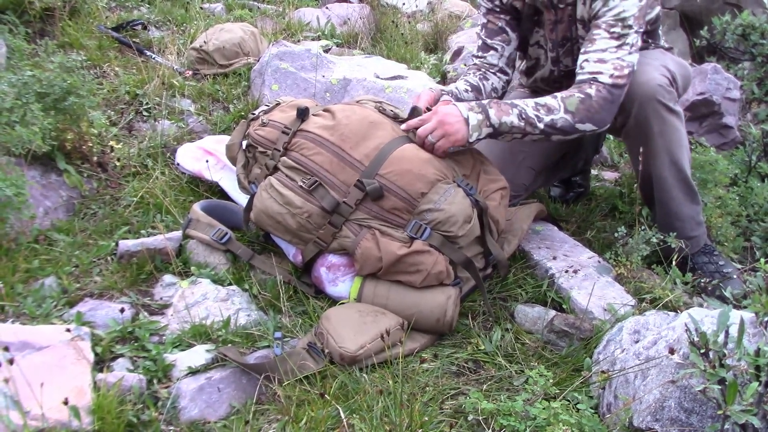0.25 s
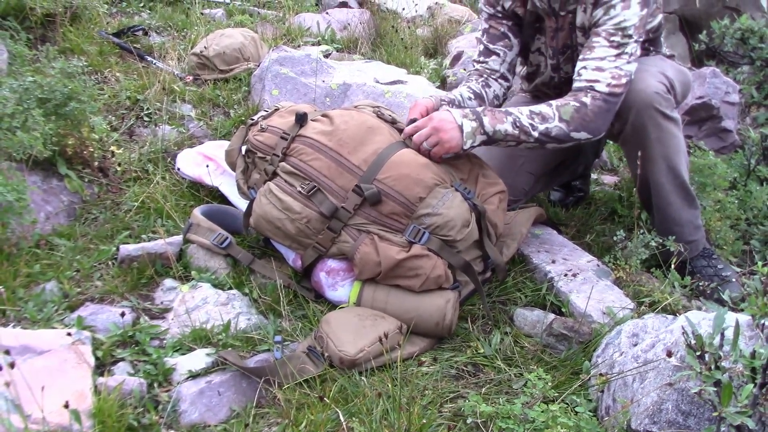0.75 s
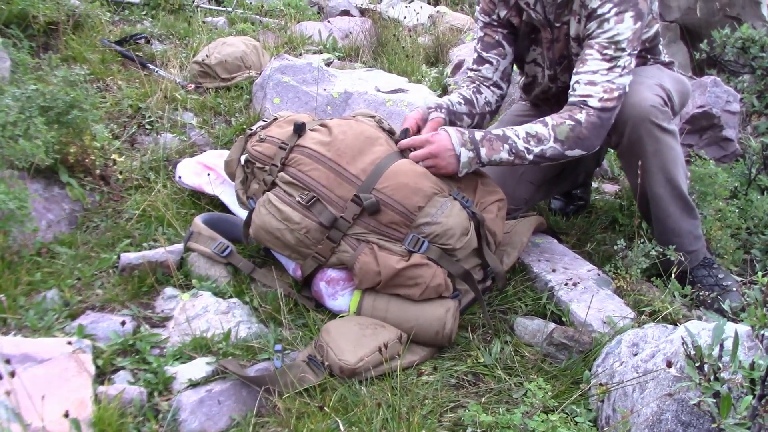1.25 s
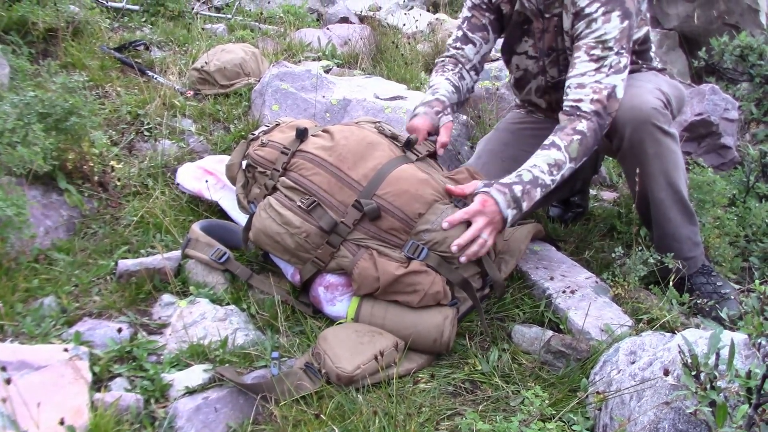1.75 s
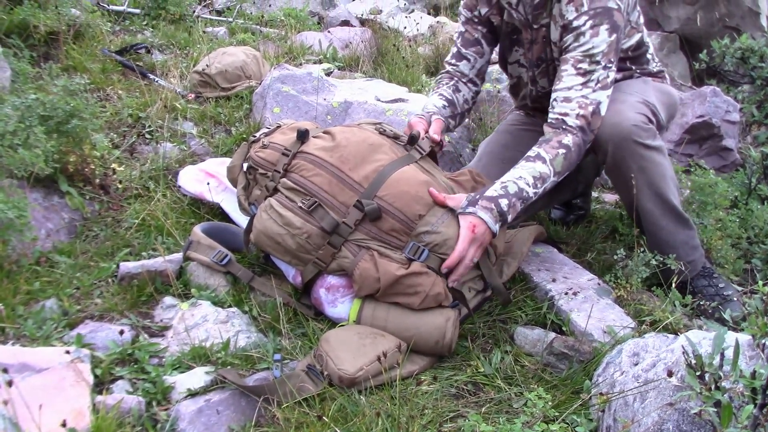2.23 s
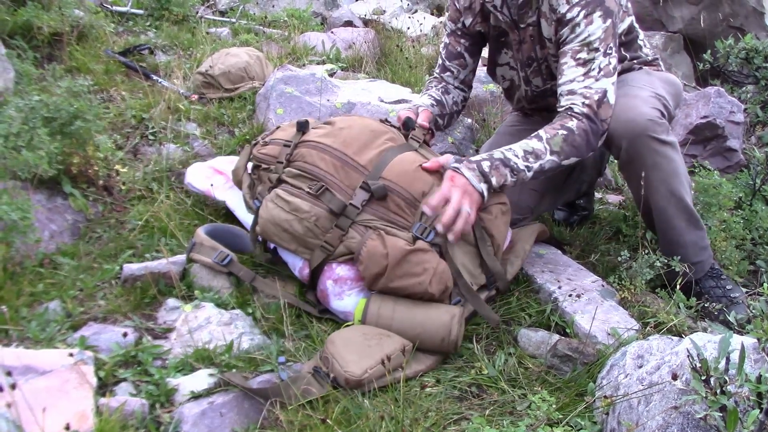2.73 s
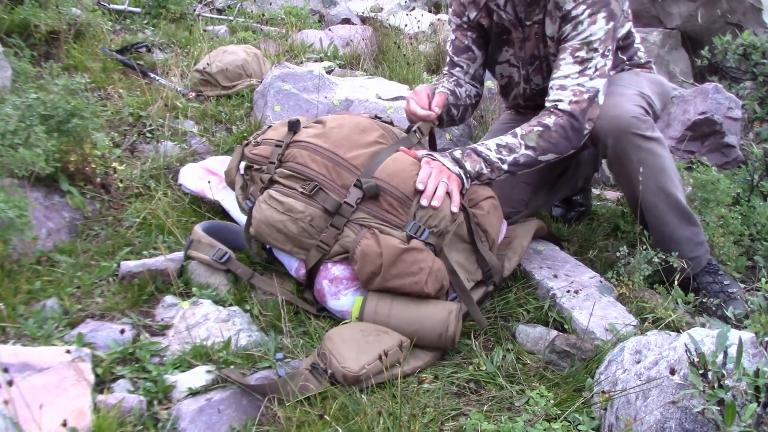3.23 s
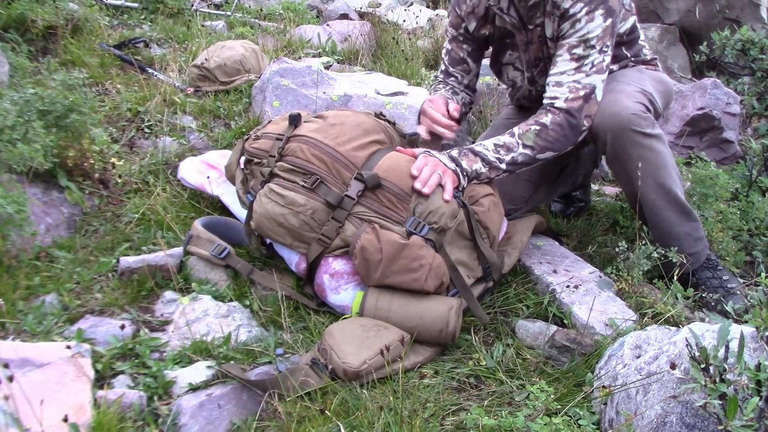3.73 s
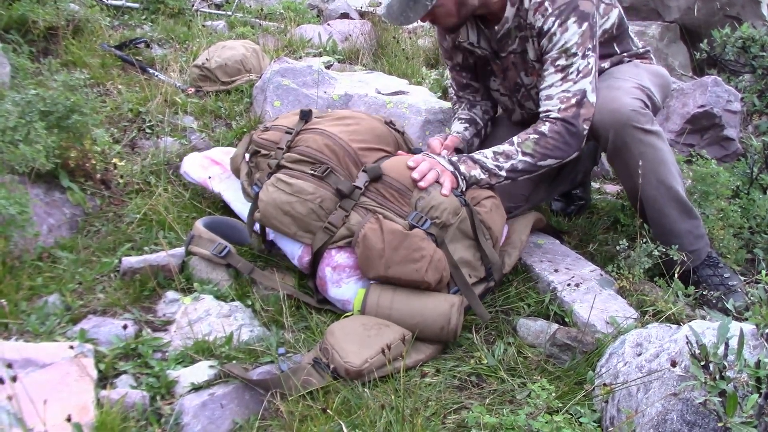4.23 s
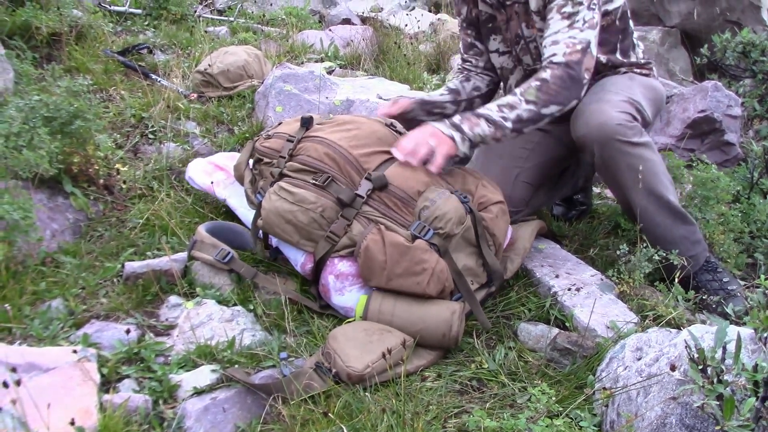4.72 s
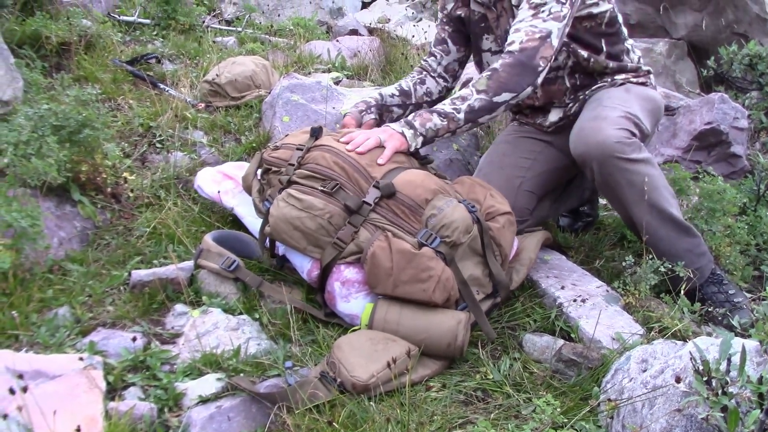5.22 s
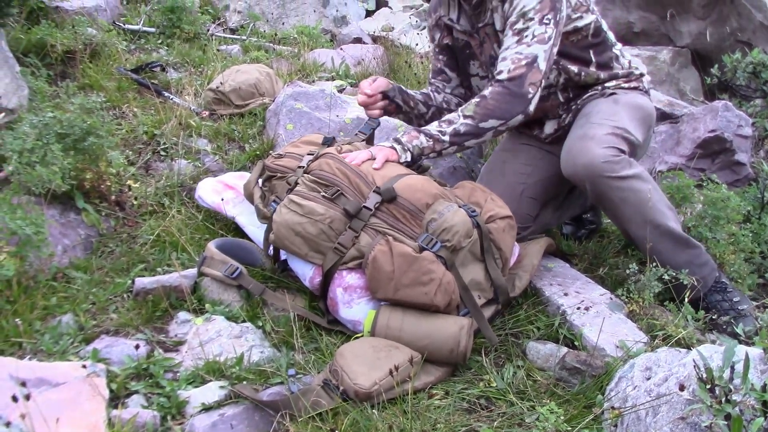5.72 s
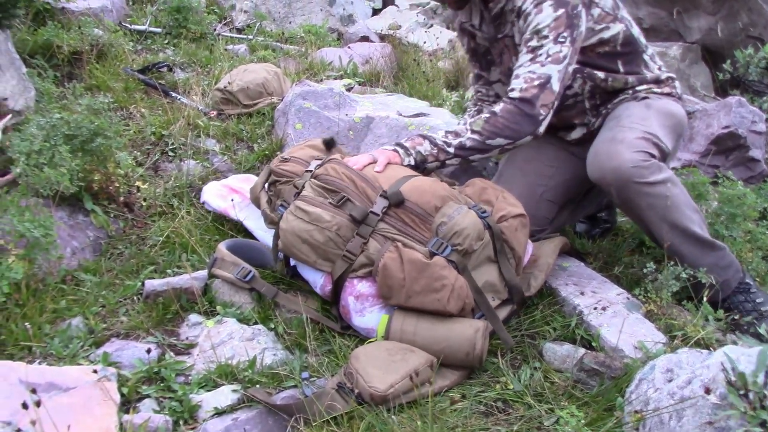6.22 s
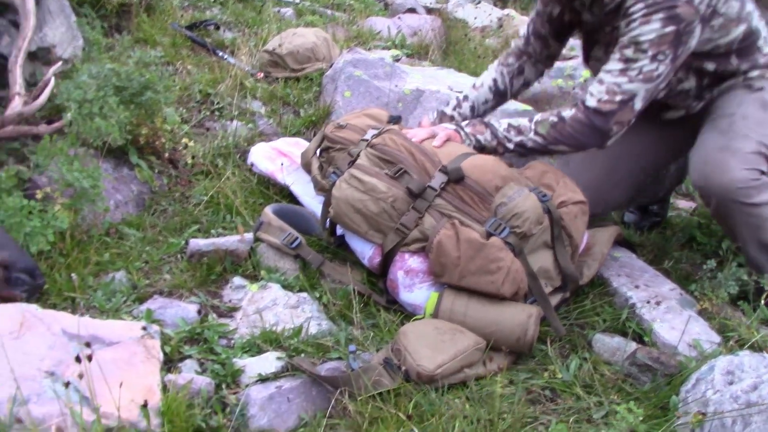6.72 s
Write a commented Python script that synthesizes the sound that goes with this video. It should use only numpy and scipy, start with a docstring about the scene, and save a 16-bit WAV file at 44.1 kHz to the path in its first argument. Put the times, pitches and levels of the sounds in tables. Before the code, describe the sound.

Close outdoor handling of a loaded pack. A brief strap rub and thump, then a crisp plastic buckle snap at about one second. Hands brush the fabric with coarse rubs and fine hiss, loose fittings tick, and short webbing tugs buzz mid-way. Near six seconds comes the loudest moment, a hard rasping strap jerk with a double knock, then it settles into faint rustle. Quiet steady air behind, almost dry.

```python
"""A backpack's plastic buckle snaps shut close to the microphone, outdoors: cracks ring a modal shell.
Around it ribbed webbing zips through its adjusters in short tugs, a pulse train whose pitch follows speed.
Hands and sleeves brush the loaded pack as shaped fibre noise; pats make short sagging tones.
Loose fittings tick through resonances; steady air, faint side noise and a thin scatter off rocks lie behind."""
import sys
import numpy as np
from scipy import signal
from scipy.fft import rfft, irfft, next_fast_len
from scipy.io import wavfile
from scipy.ndimage import map_coordinates

SR = 44100
rng = np.random.default_rng(int(sys.argv[2]) if len(sys.argv) > 2 else 0)


def pcm_store(signal):
    """Save signal as 16-bit PCM."""
    levels = np.round(np.clip(np.atleast_2d(signal), -1, 1) * 32767)
    wavfile.write(sys.argv[1], SR, levels.astype(np.int16).T)


N = 306980


def amp(db):
    """Decibels as an amplitude factor."""
    return 10 ** (np.asarray(db) / 20)


def unit(x):
    """x at rms 1."""
    return x / np.sqrt(np.mean(x ** 2) + 1e-20)


def curves(rows):
    """One value per sample for each column after the time."""
    s, *cols = np.transpose(rows)
    return [np.interp(np.arange(N) / SR, np.sort(s), c) for c in cols]


def wobble(rate):
    """A smooth random curve, rate knots a second."""
    knots = rng.standard_normal(int(N * rate / SR) + 4)
    return map_coordinates(knots, [np.arange(N) * rate / SR])


def filtered(x, response):
    """x times a response of frequency."""
    size = x.shape[-1]
    m = next_fast_len(size + 8192)
    return irfft(rfft(x, m) * response(np.fft.rfftfreq(m, 1 / SR)), m)[..., :size]


def coloured(x, points):
    """x shaped by (f/Hz, level/dB) points on a log axis, at rms 1."""
    f, db = np.transpose(points)
    return unit(filtered(x, lambda hz: amp(np.interp(np.log(hz + 1), np.log(f), db))))


def noise(size, points):
    """White noise shaped by (f/Hz, level/dB) points, at rms 1."""
    return coloured(rng.standard_normal(size), points)


def add(track, s, sound):
    """Mix a short sound in at time s."""
    part = track[max(round(s * SR), 0):][:len(sound)]
    part += sound[:len(part)]


def fibres(rate, spread_db):
    """Threads catching and letting go: dense tiny impulses of very unequal size."""
    caught = rng.random(N) < rate / SR
    return unit(caught * rng.standard_normal(N) * amp(spread_db * rng.standard_normal(N)))


# colour of the open air at the microphone: [f/Hz, level/dB]
AIR_COLOUR = [(15, -53.5), (25, -14), (59, -16.5), (127, -4.5), (206, -7), (335, 0), (575, 1.5), (1100, -6),
              (3520, -13.5), (5000, -17), (7110, -21.5), (14400, -32.5), (16000, -39)]


def air():
    """Faint air, steady noise that reaches both ears alike."""
    return amp(-55.5) * noise(N, AIR_COLOUR)


def side_noise():
    """A faint steady murmur, strongest near 300 Hz, opposite in sign at the two ears."""
    return amp(-66.0) * noise(N, [(20, -12.5), (80, -12.5), (300, -4), (2000, -14.5), (12000, -38)])


# colour of the echo off the rocks: [f/Hz, level/dB]
ROCK_COLOUR = [(200, -7.5), (1200, -6.5), (1900, -8.5), (2950, 1.5), (4500, 0), (8500, -10.5), (15000, 2)]


def rocks(x, t60):
    """A thin, short scatter from the stones and slope around: x through decaying noise."""
    t = np.arange(SR // 2) / SR
    tail = noise(len(t), ROCK_COLOUR) * amp(-60 * t / t60) * (1 - np.exp(-t / 0.0078))
    return signal.fftconvolve(x, tail / np.linalg.norm(tail))[:N]


# strokes of hands and sleeves over the pack:
# [fastest t/s, rise t/s, fall t/s, rub level/dB, hiss over rub level/dB]
STROKES_ON_PACK = [(.01, 0.033, 0.088, -47.5, -8), (.25, 0.089, 0.14, -53.5, -8.5),
                   (.584, 0.018, 0.015, -50.5, -28), (1.334, 0.027, 0.022, -53, -3.5),
                   (1.402, .03, 0.025, -49.5, -13), (1.57, 0.23, 0.043, -60, -1.5),
                   (1.83, .07, 0.17, -54, 0.5), (2.09, 0.14, .18, -49, -1), (2.36, 0.073, 0.097, -50.5, -4),
                   (2.515, 0.03, 0.058, -40, -1), (2.55, 0.058, 0.093, -37.5, -9.5),
                   (2.765, 0.042, .04, -44.5, 3), (2.815, 0.065, 0.032, -39, 4),
                   (2.858, .008, 0.017, -39, -1), (2.883, 0.017, .014, -43, 1.5),
                   (2.96, 0.036, 0.16, -47.5, 0), (3.135, 0.054, .06, -46, -4.5),
                   (3.28, 0.034, 0.08, -49, -7.5), (3.4, 0.053, 0.11, -47.5, -10.5),
                   (3.57, 0.043, 0.075, -49, -14), (3.815, .1, 0.056, -47, -2),
                   (3.95, 0.069, 0.055, -48.5, -5.5), (4.32, .04, 0.083, -48.5, -7),
                   (4.6, 0.26, .12, -50, -7.5), (4.745, 0.049, 0.036, -49.5, 3),
                   (4.837, 0.018, 0.019, -44.5, -6), (4.959, 0.011, 0.065, -46.5, -0.5),
                   (5.09, .06, 0.18, -52.5, -15), (5.305, 0.028, 0.06, -55, 2),
                   (5.37, .05, 0.06, -45.5, -6), (5.475, 0.023, 0.1, -51, -4.5),
                   (5.655, 0.075, 0.11, -48, -6), (5.975, .025, 0.12, -39, -12),
                   (6.06, .02, 0.041, -46, -15), (6.64, 0.11, 0.12, -55.5, -7.5)]
# weight put on the load: [t/s, level/dB of its mutter before LEAN_DB]
WEIGHT_ON_LOAD = [(0.0, -61), (0.64, -71), (2.91, -57.5), (4.27, -70), (4.4, -52.5), (4.63, -61.5),
                  (5.52, -51.5), (6.11, -64), (6.96, -68)]
# colours of the coarse rub, the fine hiss and the load's mutter: [f/Hz, level/dB]
RUB_COLOUR = [(150, -30), (250, -9.5), (311, -5.5), (368, -3), (441, -4.5), (569, -2), (1200, -6),
              (1530, -5.5), (3750, -13), (4500, -23), (5850, -57), (9900, -120)]
HISS_COLOUR = [(1470, -25), (2500, -0.5), (3460, -4), (3830, -3), (4340, -3), (4950, -8), (6810, -3),
               (8600, -6.5), (12100, -16.5), (14700, -26), (16000, -27)]
LOAD_COLOUR = [(25, -24.5), (70, -36.5), (120, -6), (195, 2), (260, 0), (380, -19), (800, -28),
               (2000, -74.5)]
# drop over one rise or fall time in dB; shapes: 1 = pointed, 2 = rounded
STROKE_EDGE_DB, RISE_SHAPE, FALL_SHAPE = 10.5, 1.71, 1.46
REST_RUB_DB, REST_HISS_DB = -61.5, -69  # the hands never lie quite still
LEAN_DB, DRAG_DB = 0.5, -7.5  # the mutter's gain under the weight, and its level under each rub


def cloth():
    """Each stroke swells and fades: pressure gives a coarse rub, speed a fine hiss; the load mutters below."""
    t = np.arange(N) / SR
    rub_power, hiss_power = amp(REST_RUB_DB) ** 2, amp(REST_HISS_DB) ** 2
    for s, rise, fall, db, over_db in STROKES_ON_PACK:
        before = ((s - t[t < s]) / rise) ** RISE_SHAPE
        after = ((t[t >= s] - s) / fall) ** FALL_SHAPE
        drop_db = np.minimum(STROKE_EDGE_DB * np.concatenate([before, after]), 100)
        power = amp(db - drop_db) ** 2
        rub_power = rub_power + power
        hiss_power = hiss_power + power * amp(over_db) ** 2
    folds = amp(1.33 * wobble(55))
    rub = np.sqrt(rub_power) * folds * coloured(fibres(rate=5000, spread_db=3.5), RUB_COLOUR)
    hiss = np.sqrt(hiss_power) * folds * coloured(fibres(rate=18000, spread_db=2.0), HISS_COLOUR)
    lean_db, = curves(WEIGHT_ON_LOAD)
    weight = np.sqrt(amp(lean_db + LEAN_DB) ** 2 + rub_power * amp(DRAG_DB) ** 2)
    load = weight * amp(2.7 * wobble(22)) * noise(N, LOAD_COLOUR)
    return rub + hiss + load


# dull bumps of the pack: [t/s, level/dB before the onset, nominal f/Hz, t60/s]
PACK_BUMPS = [(0.013, -27.5, 216, .046), (1.074, -37, 480, 0.033), (1.114, -29, 191, 0.042),
              (1.329, -38.5, 237, .07), (2.369, -41, 175, .11), (2.535, -34.5, 159, 0.24),
              (3.505, -30.5, 229.5, .12), (4.219, -18, 592, .036), (4.258, -29, 223, 0.16),
              (4.3, -34.5, 240, 0.077), (4.455, -37, 215, 0.18), (4.862, -32.5, 537, 0.033),
              (5.067, -30, 534, .028), (5.08, -30.5, 190, 0.057), (5.302, -34, 197, .075),
              (5.63, -36.5, 212, 0.06), (5.9729, -7, 704, .012), (5.9917, -8.5, 790, .012),
              (5.992, -9, 177, 0.076), (6.358, -39, 186, 0.079), (6.385, -40.5, 95, 0.12),
              (6.439, -38.5, 116, 0.13), (6.487, -34, 115, .052), (6.94, -28, 424, 0.059),
              (6.947, -27, 213, .15)]


def bumps():
    """The stuffed pack gives under a pat or a taut strap: a few cycles that sag in pitch, and a puff."""
    out, t = np.zeros(N), np.arange(SR // 4) / SR
    for s, db, hz, t60 in PACK_BUMPS:
        sagging_hz = hz * (0.829 + 0.3 * np.exp(-4 * t / t60))
        tone = np.sin(2 * np.pi * np.cumsum(sagging_hz) / SR)
        puff = noise(len(t), [(hz / 5, -20), (hz, 0), (hz * 2, -7), (hz * 8, -35), (hz * 40, -90)])
        onset = 1 - np.exp(-3 * t * hz)
        add(out, s, amp(db - 60 * t / t60) * onset * (tone + 0.39 * puff))
    return out


# small fittings knocking: [t/s, level/dB before the final gains, brightness level/dB]
FITTING_TICKS = [(0.395, -26, -23), (0.701, -34, -14), (2.234, -32, -17.5), (2.387, -34, -5),
                 (2.465, -33, -11), (2.6542, -30.5, -25), (2.7309, -26, -13), (2.856, -31.5, -0.5),
                 (2.9365, -37, -6), (3.1333, -23.5, -32), (3.268, -31, -20), (3.3791, -29, -29),
                 (3.424, -20, -34), (3.558, -24, -22), (3.5947, -34.5, -31), (4.0582, -34.5, -29),
                 (4.284, -20, -28), (4.292, -20, -30), (4.6773, -28, -29), (4.953, -36.5, -13),
                 (5.6767, -28, -24), (5.9756, -19, -20), (6.1187, -13.5, -21.5), (6.8368, -27.5, -37)]
# resonances of a fitting: [f/Hz, width f/Hz, level/dB]
FITTING_MODES = [(1094, 260, -9), (1900, 190, -1.5), (3050, 900, -4.5), (3710, 840, -5), (4500, 920, -14.5)]
# fainter ticks at random moments; levels scatter evenly within the spread either way
STRAY_COUNT, STRAY_DB, STRAY_SPREAD_DB, STRAY_BRIGHT_DB = 20, -39.5, 1, -14.5


def fitting_response(f):
    """Resonances of the plastic, neighbours opposite in sign."""
    total = 0
    for k, (centre, width, db) in enumerate(FITTING_MODES):
        damping = 1j * f * width
        total = total + (-1) ** k * amp(db) * damping / (centre * centre - f * f + damping)
    return total


def fittings():
    """Light contacts of plastic parts: a sharp tick, a trace of chatter, a short ring and a bright edge."""
    body, edge, t = np.zeros(N), np.zeros(N), np.arange(SR // 25) / SR
    strays = [(when * N / SR, STRAY_DB + STRAY_SPREAD_DB * (2 * size - 1), STRAY_BRIGHT_DB)
              for when, size in rng.random((STRAY_COUNT, 2))]
    for s, db, bright_db in FITTING_TICKS + strays:
        chatter = 0.19 * amp(-60 * t / 0.015) * rng.standard_normal(len(t))
        contact = (t == 0) + chatter
        add(body, s, amp(db) * contact)
        add(edge, s, amp(db + bright_db) * contact)
    band = signal.butter(2, [4500, 9500], "bandpass", fs=SR, output="sos")
    return amp(22.0) * filtered(body, fitting_response) + amp(21.5) * signal.sosfilt(band, edge)


START_SPEED, STOP_SPEED = .68, .34  # shares of a tug's top speed
BUILD_DB, EASE_DB, GRIP_S = 12.5, 15, 0.0027  # swell to the loudest moment, fall after it, grip or let go


def pull(start, fastest, loudest, stop):
    """Speed and gain of one tug: the strap gathers speed, then slows and stalls as it tightens."""
    t = np.arange(N) / SR
    arc = np.sin(np.interp(t, [start, fastest, stop], [0, np.pi / 2, np.pi])) ** 2
    slowest = np.where(t < fastest, START_SPEED, STOP_SPEED)
    grip = np.clip(np.minimum(t - start, stop - t) / GRIP_S, 0, 1)  # silent if stop comes before start
    swell_db = np.interp(t, [start, loudest], [-BUILD_DB, 0])
    ease_db = EASE_DB * np.interp(t, [loudest, stop], [0, 1]) ** 2
    return slowest + (1 - slowest) * arc, grip * amp(swell_db - ease_db)


# colour of threads scraping: [f/Hz, level/dB]
SCRAPE_COLOUR = [(60, -15), (180, 10), (370, -5), (750, 3), (1300, -7), (1900, -2), (2600, -8.5),
                 (3500, -4), (5000, -15), (10000, -17.5), (16000, -54)]
CATCH_DB, CATCH_HZ = 2.5, 120  # the strap catches and frees itself: depth, random knots a second
RIBS_DB, RIB_TOP_HZ = 2, 3900  # level of the buzz, limit for its overtones


def tug(speed, gain, top_hz, db, jitter, scrape_db, edge):
    """Ribs trip over the adjuster's bar, so pitch follows the strap's speed; threads scrape with each rib."""
    rate_hz, moving = top_hz * speed, gain > 0
    phase = 2 * np.pi * np.cumsum(rate_hz * (1 + jitter * wobble(700))) / SR
    ribs = np.zeros(N)
    for k in range(1, 5):  # the contact keeps shifting, so each overtone comes and goes by itself
        overtone_hz = k * rate_hz[moving]
        grip = amp((2 if k == 1 else 4.5) * wobble(170)[moving] - 3)
        if k > 1:  # overtones ring the adjuster
            grip *= 1 + 3.2 * np.exp(-((overtone_hz - 3500) / 350) ** 2)
        wave = np.cos(k * phase[moving] + 2 * np.pi * rng.random())
        audible = (k == 1) | (overtone_hz < RIB_TOP_HZ)
        ribs[moving] += grip * wave * audible / k ** edge
    threads = fibres(rate=14000, spread_db=0.0) * (1 + 0.67 * np.cos(phase))
    scrape = coloured(threads, SCRAPE_COLOUR)
    catches = amp(db + CATCH_DB * wobble(CATCH_HZ))
    return gain * catches * (amp(RIBS_DB) * ribs + amp(scrape_db) * scrape)


# webbing jerked taut: [t/s, level/dB, t60/s]
TAUT_JERKS = [(5.992, -17.5, 0.064), (6.938, -35, .07)]
# its colour: [f/Hz, level/dB]
JERK_COLOUR = [(60, -16), (700, 5), (1500, -17), (3500, 2), (6500, -2.5), (10000, -6), (13000, -19),
               (16000, -42)]


def jerks():
    """The slack runs out and the webbing cracks taut: decaying noise."""
    out, t = np.zeros(N), np.arange(SR // 8) / SR
    for s, db, t60 in TAUT_JERKS:
        add(out, s, amp(db - 60 * t / t60) * noise(len(t), JERK_COLOUR))
    return out


def creep(rows, colour):
    """Under tension the strap slips one rib at a time."""
    rate, db = curves(rows)
    t = np.arange(N) / SR
    moving = (t >= rows[0][0]) & (t <= rows[-1][0])
    ribs_passed = np.floor(np.cumsum(rate * (1 + 0.049 * wobble(150))) / SR)
    slips = np.diff(ribs_passed, prepend=0) * moving
    decay = np.exp(-1 / (SR * 0.0013))
    grit = rng.standard_normal(N) * signal.lfilter([1], [1, -decay], slips)
    return amp(db) * coloured(grit, colour) * np.sqrt(moving.mean())  # rms held over the moving part


# tugs on the webbing: [start t/s, fastest t/s, loudest t/s, stop t/s, top rib rate f/Hz,
# level/dB before the buzz and scrape gains, jitter 0-1, scrape level/dB, overtone fall exponent]
STRAP_TUGS = [(0, .04, 0.029, 0.076, 1080, -37.5, 0.2, -9.5, 2.2),
              (3.434, 3.49, 3.505, 3.568, 770, -26, .075, -11, 2.6),
              (4.219, 4.236, 4.254, 4.299, 1000, -21.5, .06, -9.5, 1.8),
              (5.991, 6.002, 5.994, 6.04, 3900, -22.5, .12, -4, 1.8),
              (6.014, 6.026, 6.028, 6.056, 3010, -28.5, .16, 1, 2.1),
              (6.022, 6.026, 6.047, 6.066, 980, -21, .08, -14, 2.9),
              (6.92, 6.937, 6.938, 6.88, 3250, -33, 0.2, -2.5, 1.8)]
# a taut strap creeping: [t/s, slip rate f/Hz, level/dB]
TAUT_CREEP = [(5.742, 150, -46), (5.765, 123, -53), (5.795, 120, -49.5), (5.812, 310, -51),
              (5.825, 600, -57), (5.84, 700, -70)]
# the strap settling after the hardest tug: [t/s, slip rate f/Hz, level/dB]
STRAP_SETTLING = [(6.095, 370, -50), (6.135, 260, -54.5), (6.16, 340, -51.5), (6.19, 96, -57),
                  (6.25, 49, -58), (6.34, 35, -57)]


def straps():
    """Slow tugs buzz and the fastest rasp; around the hardest one the strap creeps."""
    out = jerks()
    for start, fastest, loudest, stop, *timbre in STRAP_TUGS:
        speed, gain = pull(start, fastest, loudest, stop)
        out += tug(speed, gain, *timbre)
    out += creep(TAUT_CREEP, [(1000, -20), (3800, 2.5), (8500, -3), (15000, -34)])
    out += creep(STRAP_SETTLING, [(900, -11), (3100, 2.0), (5000, -14), (11200, -8.5), (12500, -37)])
    return out


# the buckle's prongs spring out and seat: [t/s, relative level/dB]
BUCKLE_CONTACTS = [(1.1132, -16), (1.1137, 0), (1.1148, -6)]
# modes of the buckle's plastic shell: [f/Hz, relative level/dB, t60/s]
SHELL_MODES = [(1280, -6, .008), (1860, 2, .011), (2520, 1, .014), (2870, -3, .024), (3500, -2, .013),
               (4660, -3, .011), (5400, -4, .011), (7490, -4, .011), (9500, -4, .009), (10350, -5, .01)]
# colour of the crack: [f/Hz, level/dB]
CRACK_COLOUR = [(100, -15), (600, -8), (1900, -4), (4000, -0.5), (9500, -4), (12000, -8.5), (16000, -26.5)]


def buckle():
    """Each contact cracks and rings the shell for a few hundredths of a second."""
    out, t = np.zeros(N), np.arange(SR // 8) / SR
    for s, db in BUCKLE_CONTACTS:
        ring = np.zeros(len(t))
        for k, (hz, level, t60) in enumerate(SHELL_MODES):
            struck_db = level + rng.normal(0, 1)  # each contact strikes the modes a little differently
            ring += (-1) ** k * amp(struck_db - 60 * t / t60) * np.sin(2 * np.pi * hz * t)
        fading = amp(-60 * t / 0.0089) + amp(-17 - 60 * t / 0.058)
        crack = fading * noise(len(t), CRACK_COLOUR)
        onset = 1 - np.exp(-t / .0001)
        add(out, s, amp(db) * onset * (amp(-11.5) * ring + amp(-6.0) * crack))
    return out


def scene():
    """The pack is straight ahead, close up; only the scatter and a faint murmur differ between the ears."""
    near = cloth() + bumps() + fittings() + straps() + buckle()
    low_cut = signal.butter(2, 85, "highpass", fs=SR, output="sos")  # the microphone's low cut, Hz
    near = signal.sosfilt(low_cut, near)
    open_air = air()
    mid = near + open_air + amp(-22.5) * rocks(near, t60=0.26)
    side = amp(-24) * rocks(near + open_air, t60=0.018) + side_noise()
    return np.array([mid + side, mid - side])


TOP_HZ = 16200  # the recorder's band limit


def record(dry):
    """The recorder rounds off the highest peaks and keeps nothing above its band limit."""
    rounded = dry / (1 + (dry / .9) ** 4) ** .25
    return filtered(rounded, lambda hz: hz < TOP_HZ)


dry = scene()
out = record(dry)
pcm_store(out)
```